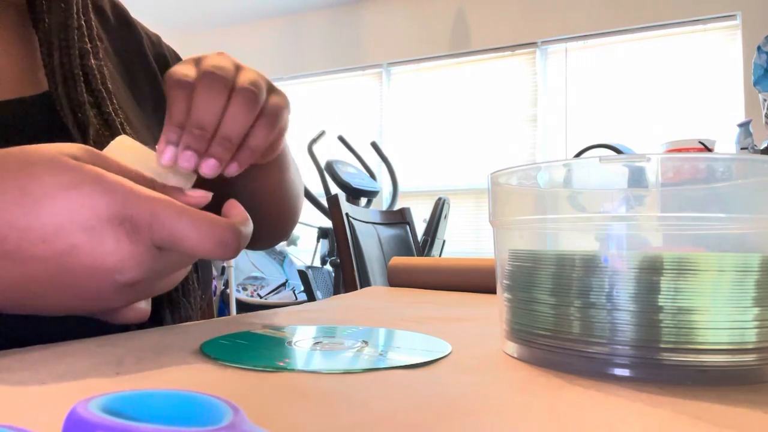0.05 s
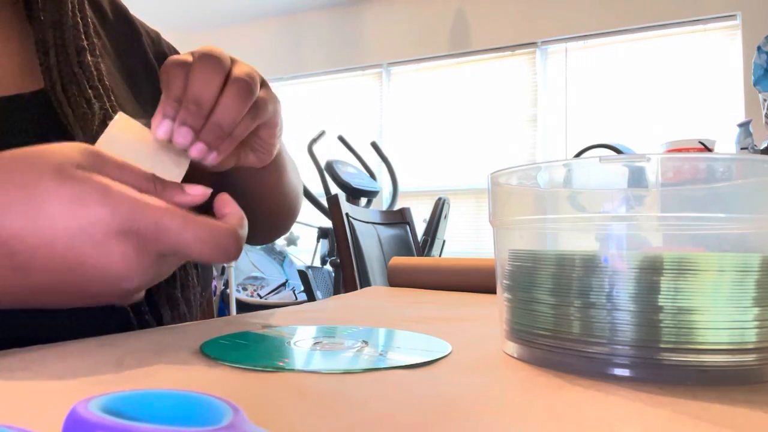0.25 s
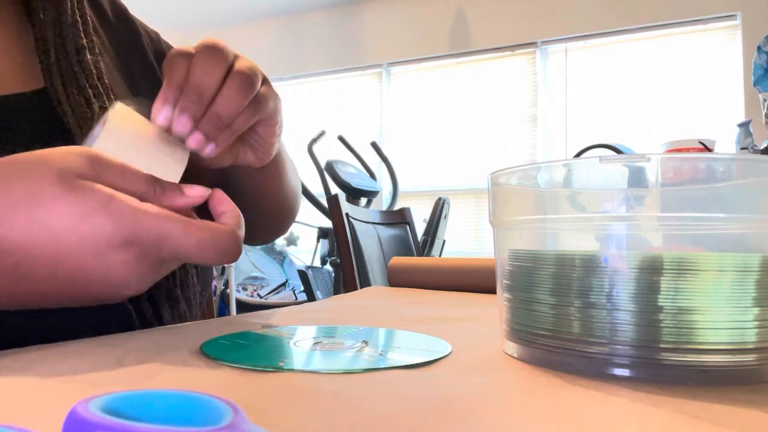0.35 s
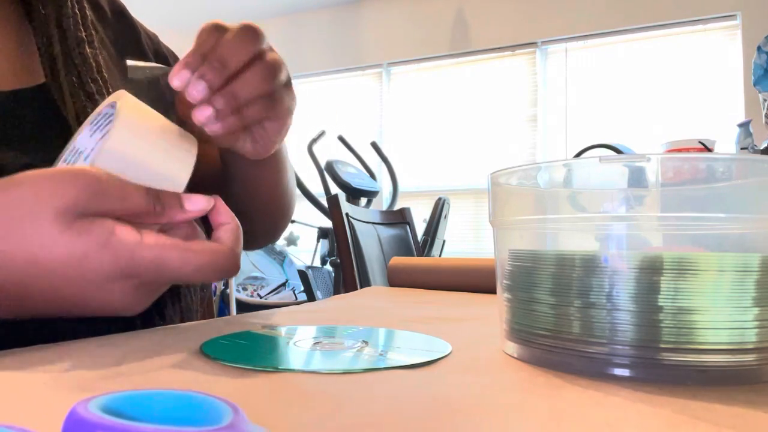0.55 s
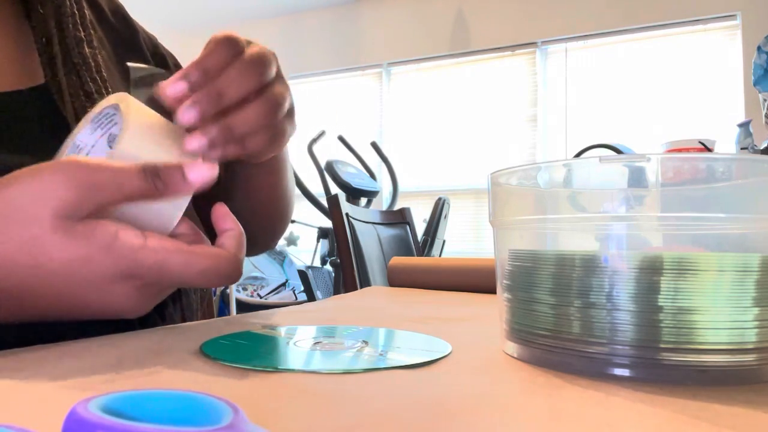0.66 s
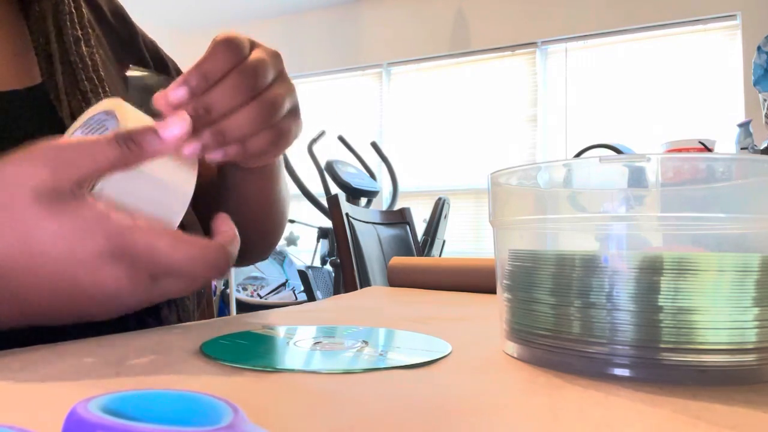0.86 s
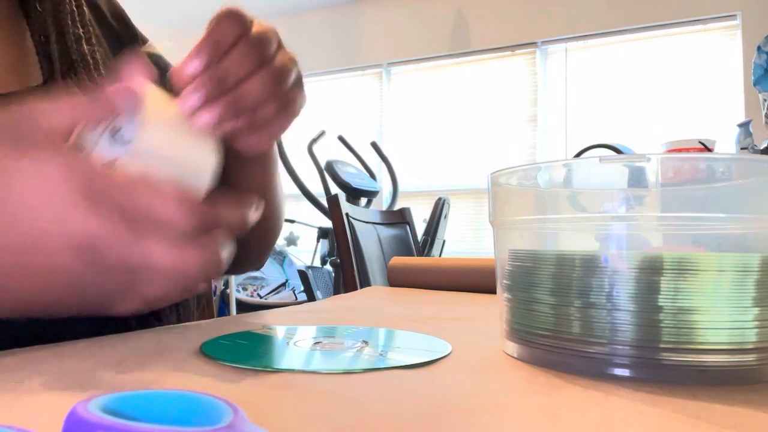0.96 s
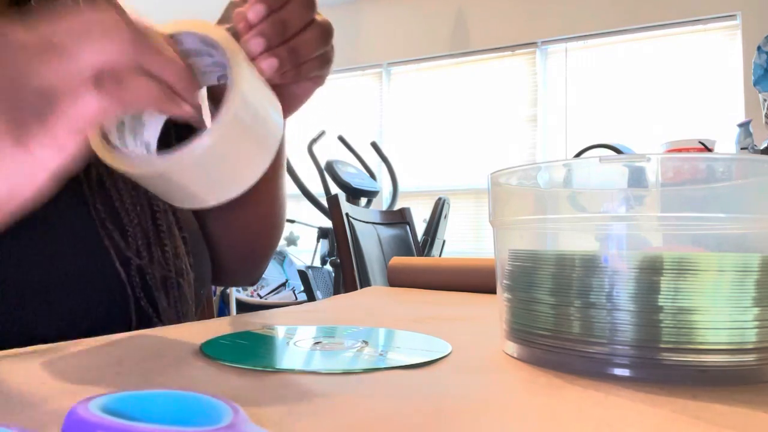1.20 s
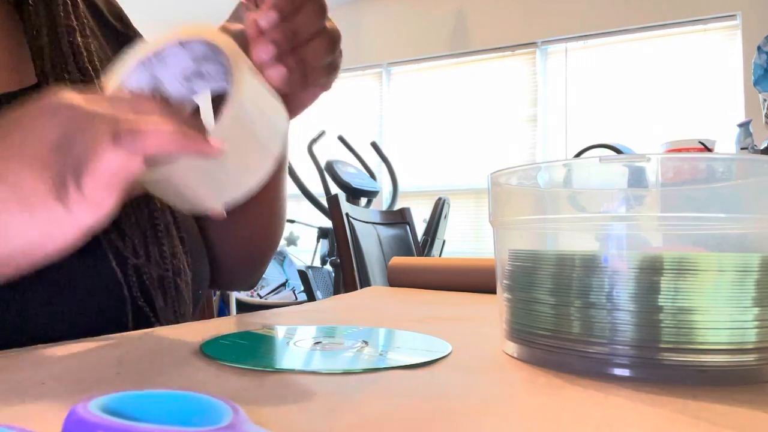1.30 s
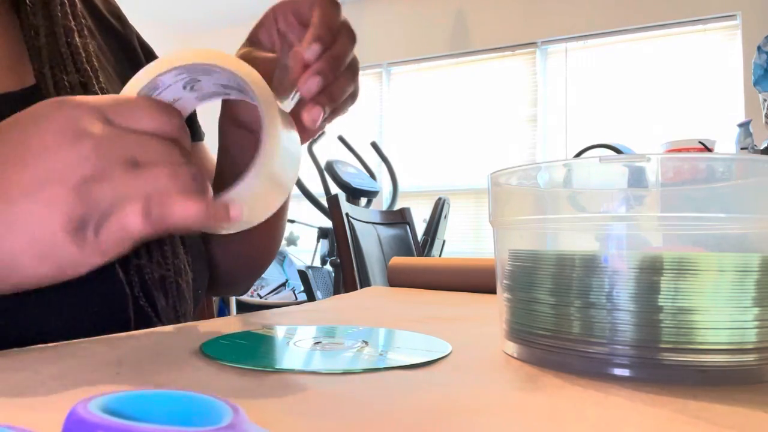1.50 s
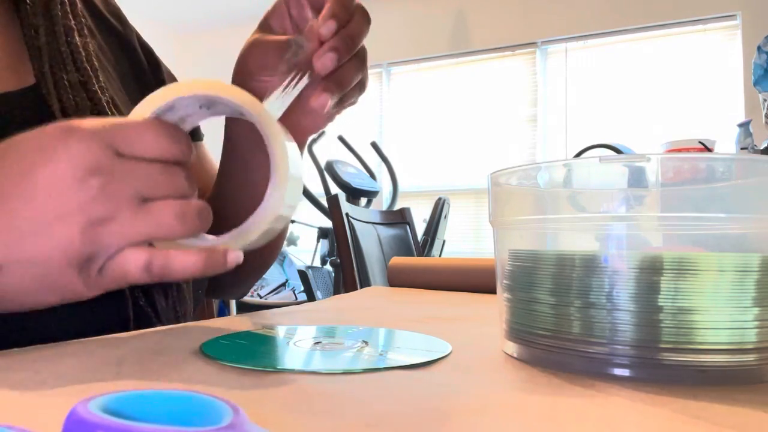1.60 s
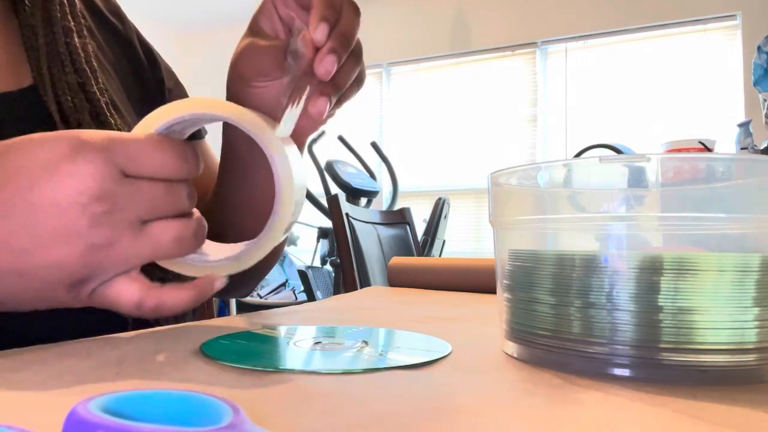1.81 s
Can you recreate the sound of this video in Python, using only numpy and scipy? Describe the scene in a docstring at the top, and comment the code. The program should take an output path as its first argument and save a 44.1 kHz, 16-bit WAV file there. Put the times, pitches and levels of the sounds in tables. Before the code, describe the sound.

Packing tape cracks and rips from its roll in brief tugs, with quiet finger handling between.

```python
"""In a living room, adhesive tape is picked at and tugged off its roll, close to a phone on a table.
The glue lets go in slips: each is a crack and a rasp of noise, plus a damped note from the taut strip.
Single snaps lead into two short rips, whose strip note tends to fall as the strip grows longer.
Fingers tap and rub the roll, its loose end rustles, and the room rings briefly over faint rumble and hum."""
import sys
import numpy as np
from scipy import signal
from scipy.fft import rfft, irfft, next_fast_len
from scipy.io import wavfile
from scipy.ndimage import uniform_filter1d, minimum_filter1d

SR = 44100
rng = np.random.default_rng(int(sys.argv[2]) if len(sys.argv) > 2 else 0)


def dump_mix(stems):
    """Bounce the given channels to the path in sys.argv[1] as a 16-bit WAV at rate SR."""
    frames = np.atleast_2d(stems).T  # one column per channel
    limited = np.clip(frames, -1, 1)  # hard clip at full scale
    pcm = np.round(limited * 32767).astype(np.int16)
    wavfile.write(sys.argv[1], SR, pcm)


N = 81585  # length [samples]


def tape():
    """Picks at the loose end, single snaps, a buzzing rip and a ragged tear: glue and strip sounds."""
    # thin clicks of the end picked loose, and full slips as a tug takes hold:
    # (time [s], crack level [dB], rasp level [dB], strip level [dB], strip note [Hz], note swell [s])
    pick_rows = [(.003, -18, -22, -18, 5940, 0.00029), (.0318, -14.5, -25, -14.5, 12300, 0.00017),
                 (.1675, -52, -65, -41, 12500, 0.000093), (.2092, -2.5, -9.5, -18.5, 1866, 0.00029),
                 (1.8461, -23.5, -12, -17, 6700, .0003)]
    snap_rows = [(.3463, -1.5, -7, -14.5, 2200, .0005), (.351, -7, -6, -4.5, 2900, .0003),
                 (0.3546, -5, -6.5, -7, 2300, .0004), (0.3657, -8.5, -2.5, -10, 2150, .0005),
                 (0.3676, -2.5, -12, -8.5, 2059, .0005), (1.4897, -3.5, -6, -12, 1500, 0.00054)]
    # first rip, a regular buzz, and second rip, a fast ragged tear:
    # (time [s], rate [slips/s], crack level [dB], rasp level [dB], strip level [dB], strip note [Hz])
    buzz_curve = [(.3838, 220, -6.5, -16.5, -15.5, 1600), (.388, 280, -9.5, -16, -9, 1470),
                  (.396, 358, -7, -14, -11, 1550), (.403, 298, -13.5, -12.5, -8, 1330),
                  (.411, 322, -6, -14.5, -8.5, 1426), (.419, 315, -19.5, -18.5, -10.5, 1100)]
    tear_curve = [(1.5178, 732, -9, -22, -25.5, 1350), (1.523, 953.6, -8.5, -17.5, -28.5, 1470),
                  (1.532, 723.7, -3.5, -13.5, -43.5, 663), (1.543, 633, -9.5, -20, -23.5, 583),
                  (1.556, 616, -2.5, -17.5, -28.5, 614), (1.567, 615.3, -16.5, -28, -33.5, 623),
                  (1.578, 612, -21, -20.5, -29.5, 614)]
    # colours of the rasping backing: (frequency [Hz], level [dB])
    pick_rasp = [(100, -42), (750, -18.5), (1100, -7.5), (2100, -1.5), (2700, -8), (3400, 0), (4600, -12),
                 (5600, -9.5), (6800, 4), (8400, 5), (13000, -16.5)]
    snap_rasp = [(100, -40), (400, -18.5), (750, -3), (1100, 1.5), (2100, -10.5), (3500, 3.5), (4600, 1.5),
                 (5400, -4), (6800, 2.5), (8400, -10), (13000, -19)]
    buzz_rasp = [(100, -32.5), (300, -25.5), (650, -2.5), (1600, 3.5), (2100, -2.5), (2800, -2.5),
                 (3600, 10.5), (5200, -4.5), (6800, 3.5), (8400, -16), (13000, -16)]
    tear_rasp = [(100, -18), (250, -16), (380, -4), (650, 10), (900, -4), (1700, 4.5), (3300, 7), (4000, 8),
                 (4800, 6.5), (6800, 10), (8400, -31.5), (13000, -0.5)]
    # colours of the flicked strip: (frequency [Hz], level [dB])
    snap_strip = [(100, -29), (600, -17), (1300, 1), (15000, 3.5)]
    rip_strip = [(100, -18), (300, -13), (600, 3.5), (15000, 4)]

    snap_decay_s = .0007
    picks = [(*row, snap_decay_s) for row in pick_rows]
    snaps = [(*row, snap_decay_s) for row in snap_rows]
    buzz = rip(buzz_curve, swell_s=.00035, jitter=.037, scatter_db=-1, decay_s=.0018)
    tear = rip(tear_curve, swell_s=.00081, jitter=.1, scatter_db=4.3, decay_s=.00071)
    singles = peel(picks, pick_rasp, snap_strip) + peel(snaps, snap_rasp, snap_strip)
    rips = peel(buzz, buzz_rasp, rip_strip) + peel(tear, tear_rasp, rip_strip)
    return singles + rips


def rip(curve, swell_s, jitter, scatter_db, decay_s):
    """Stick and slip: a run of slips, each a little off in time, strength and note."""
    note_wander = .08  # spread of the note's natural logarithm from slip to slip
    times, *controls = np.array(curve, float).T
    at = times[0]
    slips = []
    for late, sharp, strong, high in rng.standard_normal((200, 4)):
        if at > times[-1]:
            break
        rate, crack_db, rasp_db, strip_db, hz = (np.interp(at, times, c) for c in controls)
        glue_db = scatter_db * sharp  # crack and rasp vary together, the strip on its own
        note_hz = hz * np.exp(note_wander * high)
        slips.append((at, crack_db + glue_db, rasp_db + glue_db, strip_db + scatter_db * strong,
                      note_hz, swell_s, decay_s))
        at += np.exp(jitter * late) / rate
    return slips


def peel(slips, rasp_colour, strip_colour):
    """Every slip cracks the glue, rasps the backing and flicks the free strip; gives glue and strip sounds."""
    # colour of the parting glue: (frequency [Hz], level [dB])
    crack_colour = [(1000, -50), (4000, -5), (8300, -8), (9500, -1.5), (11200, -1.5), (13500, -2),
                    (15000, -10.5), (16200, -25.5)]
    rasp_decay_ratio, strip_late_s = 1.3, .0003  # the rasp outlasts the crack, the strip follows it
    crack, rasp, strip = np.zeros((3, 2, N))
    for at, crack_db, rasp_db, strip_db, hz, swell_s, decay_s in slips:
        add(crack, at, undb(crack_db) * wide_burst(decay_s))
        add(rasp, at, undb(rasp_db) * wide_burst(decay_s * rasp_decay_ratio))
        add(strip, at + strip_late_s, undb(strip_db) * flick(hz, swell_s))
    glue = colour(crack, crack_colour) + colour(rasp, rasp_colour)
    return np.array([glue, colour(strip, strip_colour)])


def wide_burst(decay_s):
    """A puff heard by both ears, plus a share that scatters off the hands, unlike in the two ears."""
    share = .1  # of the energy
    scattered = np.array([burst(decay_s), burst(decay_s)])
    return np.sqrt(1 - share) * burst(decay_s) + np.sqrt(share) * scattered


def burst(decay_s):
    """A dying puff of noise whose spectrum is evened out and whose energy follows from its decay alone."""
    fade = np.exp(-np.arange(SR // 20) / SR / decay_s)
    spectrum = rfft(rng.standard_normal(len(fade)) * fade)
    even = irfft(spectrum / (abs(spectrum) + 1e-12), len(fade))  # keeps the phases only
    puff = even * fade ** .5
    return puff * np.sqrt(np.sum(fade ** 2) / np.sum(puff ** 2))


def flick(hz, swell_s):
    """A heavily damped note that swells to full level in swell_s, then dies away."""
    t = np.arange(SR // 6) / SR
    swell = t / swell_s * np.exp(1 - t / swell_s)
    return np.sin(2 * np.pi * hz * t) * swell


def fingers():
    """Soft damped knocks and noise ticks on the roll, and skin rubbing over it as noise."""
    # fingers on the roll: (time [s], knock level [dB], knock note [Hz], tick level [dB], length [s])
    taps = [(0.0943, -43.5, 2520, -39, 0.0016), (.586, -52.5, 1230, -36.5, 0.0042),
            (.677, -54, 1640, -42.5, 0.0013), (0.802, -47, 620, -49, 0.0017), (.823, -47, 750, -50, .002),
            (0.8347, -47, 900, -34.5, 0.005), (.841, -46, 1442, -49, 0.00235),
            (0.845, -44, 757, -43, 0.0034), (1.092, -48, 1716, -49.5, 0.0037),
            (1.2432, -48.5, 1650, -47, 0.0015), (1.439, -53.5, 1720, -69, 0.0023)]
    # skin rubbing on the roll: (time [s], level [dB])
    rub_curve = [(0, -72.5), (0.199, -73.5), (.3, -53), (.57, -68), (.68, -66), (.77, -70.5), (.87, -59),
                 (.97, -84), (1.12, -68.5), (1.19, -77.5), (1.26, -59), (1.34, -79.5), (1.39, -73.5),
                 (1.448, -58), (1.6, -39.5), (1.85, -68)]
    skin_colour = [(150, -11.5), (700, -7), (2000, 2.5), (3600, 0.5), (5000, 0), (8000, -10), (15000, -21)]
    rub = rng.standard_normal(N) * level_curve(rub_curve)
    knocks, ticks = np.zeros((2, N))
    for at, knock_db, hz, tick_db, length_s in taps:
        add(knocks, at, undb(knock_db) * flick(hz, length_s / 2))
        add(ticks, at, undb(tick_db) * burst(length_s))
    return knocks + colour(ticks + rub, skin_colour)


def handling():
    """Dull damped bumps as the roll is turned over, and the loose end rustling as spiky noise."""
    # bumps of the hands and roll: (time [s], level [dB], note [Hz], swell [s])
    bump_rows = [(.36, -53.5, 65, 0.012), (0.576, -65, 129.1, 0.029), (.6, -58, 493, 0.0055),
                 (.995, -66.5, 493, 0.0071), (1.13, -65, 474.7, .012)]
    # rustle of the loose tape end: (time [s], level [dB])
    rustle_curve = [(0, -54.5), (0.302, -71), (0.599, -81.5), (0.952, -100), (1.19, -84.5), (1.255, -66),
                    (1.34, -99), (1.393, -68.5), (1.45, -82), (1.85, -85)]
    rustle_colour = [(300, -20), (2000, -8.5), (5000, 2.5), (11000, -1.5), (15000, -5.5)]
    bumps = np.zeros(N)
    for at, db, hz, swell_s in bump_rows:
        add(bumps, at, undb(db) * flick(hz, swell_s))
    rustle = rng.laplace(size=N) * level_curve(rustle_curve)
    return bumps + colour(rustle, rustle_colour)


def room():
    """Two-microphone responses: direct sound with the table; furniture and walls, whose treble dies first."""
    # colours of the reflections off near furniture and off the walls: (frequency [Hz], level [dB])
    near_colour = [(150, -9), (600, -2), (1500, -7.5), (4000, -7), (8000, -7), (15000, -18.5)]
    walls_colour = [(150, -11), (400, -10.5), (800, -17.5), (1300, -27), (2000, -22), (3500, -20.5),
                    (7000, -18), (9000, -17), (15000, -22)]
    right_late_s, pan_db = .00008, -.4  # the delay is rounded to whole samples; pan is left over right
    width_hz = 1100  # furniture and wall reflections differ between the ears above this
    walls_gap_s = .008

    size = 32
    delay = np.round(np.array([[0], [right_late_s * SR]]))
    balance = undb(np.array([[pan_db], [-pan_db]]) / 2)
    direct = np.zeros((2, N))
    direct[:, :size] = np.sinc(np.arange(size) - delay) * balance
    table = undb(-9.5) * echoes(t60_s=.014, start_s=.00039, width_hz=6000)  # quick, off the table top

    near = colour(echoes(.11, .002, width_hz), near_colour)
    low = colour(echoes(.52, walls_gap_s, width_hz), [(7000, 0), (9000, -14), (15000, -35)])
    high = colour(echoes(.33, walls_gap_s, width_hz), [(4000, -20), (8000, 0)])
    return direct + table, near + colour(low + high, walls_colour)


def echoes(t60_s, start_s, width_hz):
    """Dense reflections, noise of about unit energy, that begin after a gap and fall 60 dB in t60_s."""
    t = np.arange(N) / SR
    fade = (t > start_s) * np.exp(-np.log(1000) * t / t60_s)
    return stereo_noise(width_hz) * fade / np.sqrt(np.sum(fade ** 2))


def air():
    """Faint room rumble as coloured noise, and mains hum as steady sines."""
    # colour of the room air: (frequency [Hz], relative level [dB])
    air_colour = [(20, -29.5), (50, -3), (90, -7), (240, -5.5), (500, -11), (900, -22.5), (2200, -22.5),
                  (3500, -34), (7000, -31), (15000, -55)]
    # mains hum: (frequency [Hz], RMS level [dB])
    hum_rows = [(120, -77), (241, -77)]
    air_db = -65.5  # RMS
    noise = colour(stereo_noise(width_hz=84), air_colour)
    t = np.arange(N) / SR
    hum = sum(np.sqrt(2) * undb(db) * np.sin(2 * np.pi * hz * t) for hz, db in hum_rows)
    return noise / noise.std() * undb(air_db) + hum


def stereo_noise(width_hz):
    """White noise, alike in both ears well below a frequency and ever less related above it."""
    mid, side = rfft(rng.standard_normal((2, N)))
    alike = 1 / (1 + (np.arange(len(mid)) * SR / N / width_hz) ** 2)
    shared = mid * np.sqrt(1 + alike)
    opposed = np.array([[1], [-1]]) * side * np.sqrt(1 - alike)
    return irfft(shared + opposed, N) / np.sqrt(2)


def undb(db):
    """Decibels to amplitude."""
    return 10 ** (np.asarray(db) / 20)


def level_curve(points):
    """Amplitude over time through (time [s], level [dB]) points."""
    return undb(np.interp(np.arange(N) / SR, *np.array(points).T))


def colour(x, points):
    """Causal minimum-phase filter through (frequency [Hz], level [dB]) points."""
    size = 2 * next_fast_len(N)
    hz, db = np.array(points, float).T
    f = np.maximum(np.arange(size // 2 + 1) * SR / size, 1)
    cepstrum = irfft(np.log(undb(np.interp(np.log(f), np.log(hz), db))))
    # folding the cepstrum onto positive time gives the causal phase
    cepstrum[1:size // 2] *= 2
    cepstrum[size // 2 + 1:] = 0
    return irfft(rfft(x, size) * np.exp(rfft(cepstrum)))[..., :N]


def add(track, at_s, sound):
    """Mix a short sound in at a time."""
    i = int(np.clip(at_s * SR, 0, N - 1))
    track[..., i:i + sound.shape[-1]] += sound[..., :N - i]


def heard(sound, response):
    """A sound as it reaches the two microphones through a room response."""
    return signal.fftconvolve(sound, response, axes=1)[:, :N]


def scene():
    """Tape and hands heard close up, with the room behind them."""
    strip_room_db = -2  # the thin strip throws less into the room
    glue, strip = tape()
    hands = fingers() + handling()
    close, far = room()
    return air() + heard(hands + glue, close + far) + heard(strip, close + undb(strip_room_db) * far)


def record(dry):
    """The phone holds down the sharpest peaks, both channels alike, and cuts the top."""
    ceiling_db, limiter_s, top_hz = -2, .0013, 16200
    size = int(limiter_s * SR) | 1  # odd, so the window is centred on each peak
    gain = np.minimum(1, undb(ceiling_db) / (abs(dry).max(axis=0) + 1e-9))
    held = dry * uniform_filter1d(minimum_filter1d(gain, size), size)
    low_pass = signal.ellip(10, .2, 80, top_hz, fs=SR, output="sos")
    return signal.sosfilt(low_pass, held)


dry = scene()
out = record(dry)
dump_mix(out)
```